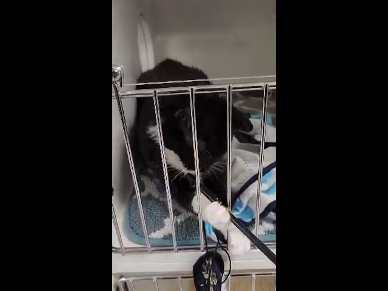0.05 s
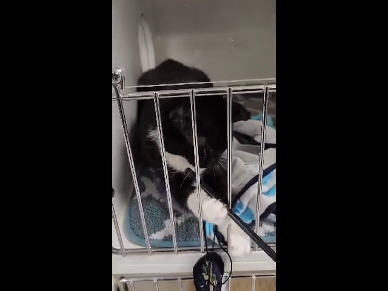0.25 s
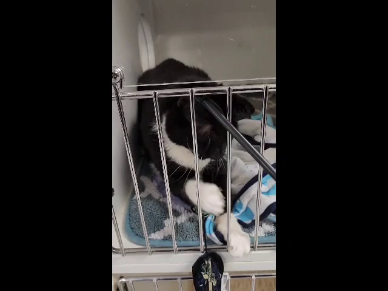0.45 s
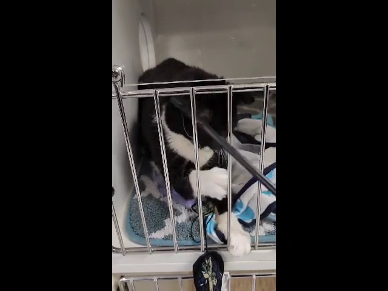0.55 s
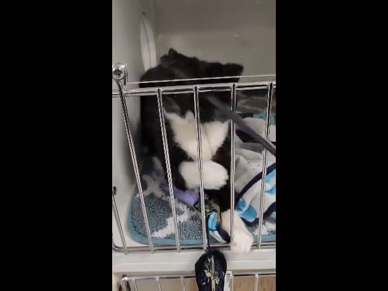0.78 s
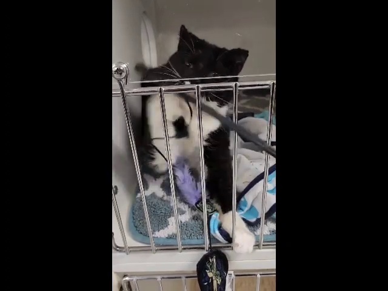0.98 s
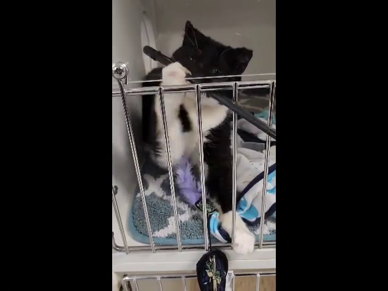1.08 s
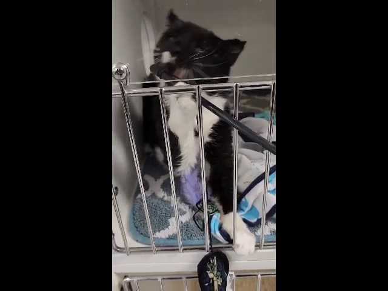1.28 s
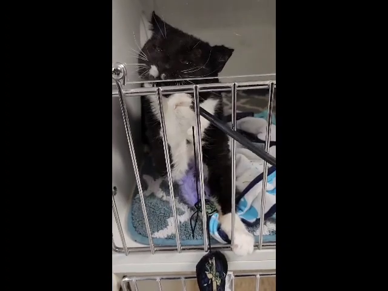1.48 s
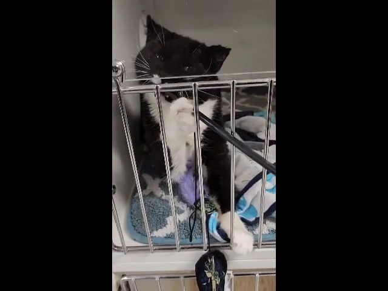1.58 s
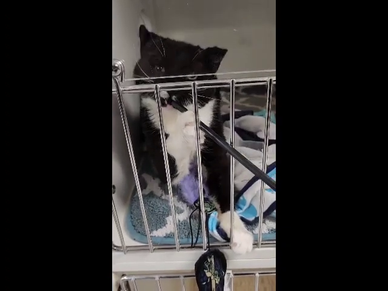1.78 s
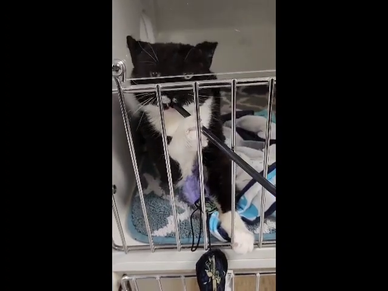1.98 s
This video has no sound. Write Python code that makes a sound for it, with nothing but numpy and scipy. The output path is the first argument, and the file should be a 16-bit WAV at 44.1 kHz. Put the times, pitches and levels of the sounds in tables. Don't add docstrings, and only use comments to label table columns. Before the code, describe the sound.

A plastic toy stick knocks against a wire cage door. Low ventilation hum alone opens, then a sharp rattling cluster strikes at 0.4-0.5 s, single clacks at 0.65, 0.74 and 0.9, a strong one at 0.99 and a bright double or triple hit at 1.1. Bars ring briefly and the steel wall booms. From 1.3 to 1.9 s, faint tooth and claw taps and soft fur brushing, close up.

```python
import sys
import numpy as np
from scipy import signal
from scipy.fft import rfft, irfft
from scipy.io import wavfile
from scipy.ndimage import uniform_filter1d

SR = 44100
rng = np.random.default_rng(int(sys.argv[2]) if len(sys.argv) > 2 else 0)


def wav_out(sig):
    wavfile.write(sys.argv[1], SR, np.round(np.clip(np.atleast_2d(sig).T, -1, 1) * 32767).astype(np.int16))


def linear_from_db(decibels):
    return 10 ** (np.asarray(decibels, float) / 20)


N = 90404
LAG_S, UNALIKE, ALIKE_HZ = -0.00023, 1.445, 314
LOW_HZ, BRIGHT_HZ = 2400, 8500
CONTACT_S, RATTLE_S, RATTLE_DB = 0.0007, 0.012, -8
WAVER_DB = 3.0
LEFT_RIGHT = np.array([[1], [-1]]) / 2


def unit(x):
    return x / np.sqrt(np.mean(x ** 2))


def colour(x, table, extra=0):
    hz, table = np.fft.rfftfreq(x.shape[-1], 1 / SR) + 1, np.array(table)
    db = np.interp(np.log(hz), np.log(table[:, 0]), table[:, 1])
    db = db - 12 * np.log2(np.maximum(table[0, 0] / hz, 1))
    return irfft(rfft(x) * linear_from_db(db + extra), x.shape[-1])


def ports(size):
    shared, *own = rfft(rng.standard_normal((3, size)))
    hz = np.fft.rfftfreq(size, 1 / SR)
    share = UNALIKE * hz ** 2 / (hz ** 2 + ALIKE_HZ ** 2)
    lag = np.exp(-2j * np.pi * hz * LAG_S * np.array([[1], [0]]))
    return irfft((shared * lag + share * np.array(own)) / np.sqrt(1 + share ** 2), size)


def ring(times, gains, hz, t60, spread):
    strikes = np.zeros(N, complex)
    np.add.at(strikes, np.minimum((times * SR).astype(int), N - 1), gains)
    pole = np.exp(2j * np.pi * hz / SR - np.log(1000) / (t60 * SR))
    mode = signal.lfilter([1], [1, -pole], strikes)
    left_phase = spread - 2 * np.pi * hz * LAG_S
    return (mode * np.exp(1j * np.array([[left_phase], [0]]))).imag


def tone_db(hz, low_db, bright_db):
    return low_db / (1 + (hz / LOW_HZ) ** 4) + bright_db / (1 + (BRIGHT_HZ / hz) ** 4)


def walk(rate):
    k = int(SR / rate)
    steps = np.repeat(rng.standard_normal(N // k + 1), k)
    return 1.6 * uniform_filter1d(uniform_filter1d(steps, k), k)[:N]


# hz, level_db [dB per Hz]
AIR = [(12, -51), (20, 5), (60, -0.5), (134, -23), (210, -4.5), (277, -14), (310, -19), (738, -33.5),
       (16000, -64.5)]
# pitch_hz, width_hz, level_db
DUCT = [(52, 14, -48), (73.4, 22, -45), (171.5, 51, -47), (213.1, 25, -53.5), (318.5, 40, -57.5),
        (412, 35, -66.5)]
# time_s, level_db
RUMBLE = [(0.0, -52), (0.13, -46.5), (0.29, -42), (0.38, -41.5), (0.85, -47.5), (1.14, -45.5),
          (1.37, -45.5), (1.66, -44), (2.05, -46)]


def ventilation():
    hz = np.fft.rfftfreq(N, 1 / SR) + 1
    out = linear_from_db(-48 + 3 * walk(17)) * unit(colour(ports(N), AIR))
    swell = np.interp(np.arange(N) / SR, *np.array(RUMBLE).T) + 45
    for f, width, db in DUCT:
        hum = unit(irfft(rfft(ports(N)) / (1 + ((hz - f) / (width / 2)) ** 2), N))
        out = out + linear_from_db(db + walk(3.4) + swell * (f < 100)) * hum
    return out


# start_s, rise_s, fall_t60_s, level_db, bright_db
BRUSHES = [(0.0, 0.0024, 0.33, -64, -1), (0.219, 0.1, 1, -64.5, -1.5), (1.305, 0.0062, 0.45, -52, -4.5),
           (1.317, .005, .22, -50, 6), (1.486, 0.0024, 0.17, -50.5, 3), (1.558, 0.015, 1, -64, -7),
           (1.831, 0.073, 0.24, -66.5, -11)]
# hz, level_db [dB per Hz]
FUR = [(700, 1), (1500, -8), (2250, -0.5), (3300, -9.5), (4700, -12.5), (7400, -2.5), (9300, -14.5),
       (15000, -22.5)]


def fur():
    t, out, hz = np.arange(N) / SR, 0, np.fft.rfftfreq(N, 1 / SR) + 1
    for s, rise, t60, db, bright in BRUSHES:
        fall = linear_from_db(-60 * np.maximum(t - s - rise, 0) / t60)
        env = linear_from_db(db) * np.clip((t - s) / rise, 0, 1) * fall
        out = out + env * unit(colour(ports(N), FUR, tone_db(hz, 0, bright)))
    return out * linear_from_db(1.3 * walk(150))


# start_s, level_db, pitch_hz, ring_t60_s
TAPS = [(0.1266, -66.5, 4840, 0.03), (1.4213, -54, 1870, 0.17), (1.42, -60, 3240, 0.1),
        (1.427, -52, 1136, 0.2), (1.489, -54, 7200, 0.019), (1.49, -54, 4220, 0.058),
        (1.499, -56.5, 2070, 0.13), (1.6346, -61, 3700, 0.09), (1.637, -60, 590, .15),
        (1.575, -64, 2900, .15), (1.665, -65, 2050, .1), (1.84, -70, 2120, .9), (1.49, -59, 11300, .02),
        (1.637, -58, 1160, 0.11), (1.731, -50, 1860, 0.045), (1.731, -55.5, 6730, 0.031),
        (0.585, -37, 396, 0.24), (1.879, -56.5, 589, 0.12), (1.8772, -64.5, 3700, 0.07),
        (1.879, -64, 1044, 0.13), (2.046, -74.5, 3000, 0.03)]
# hz, level_db [dB per Hz]
KNOCK = [(450, -10.5), (1100, -4), (1900, -8), (2650, -8), (3800, -4.5), (7400, -3), (8800, -10.5),
         (14000, -21.5)]


def taps(size=8192):
    out, t, f = np.zeros((2, N + size)), np.arange(size) / SR, np.fft.rfftfreq(size, 1 / SR)
    for s, db, hz, t60 in TAPS:
        burst = unit(irfft(rfft(ports(size)) / (1 + ((f - hz) / (0.1 * hz)) ** 2), size))
        burst = burst * linear_from_db(-60 * t / t60)
        click = unit(colour(ports(size), KNOCK)) * linear_from_db(-60 * t / 0.03 - 11)
        i = int(s * SR)
        out[:, i:i + size] += linear_from_db(db) * np.clip(t / 0.0008, 0, 1) * (burst + click)
    return out[:, :N]


# start_s, level_db, door_shake_db, low_db, bright_db
KNOCKS = [(0.4135, -35, -13.5, 3, 2), (0.4469, -14.5, -7.5, -12.5, 5.5), (0.4555, -18, -19.5, -0.5, -5),
          (0.478, -31, -15, -1, 0.5), (0.4973, -18.5, -15.5, -1, -0.5), (0.5045, -23, -8.5, -6.5, -10),
          (0.6474, -26, -16.5, -7, -6), (0.7392, -20, -4, -3, -1.5), (0.8974, -30.5, -5.5, 0, 1.5),
          (0.9627, -41, -7, -3, 8), (0.9872, -17, 3.5, -2.5, 7), (1.1064, -17.5, -0.5, -2.5, 4.5),
          (1.114, -17.5, -0.5, -1.5, -3.5), (1.1262, -22, 1, 5.5, 12.5)]
# pitch_hz, level_db, t60_s
DOOR = [(146.2, -1.5, 0.34), (174, -11, .2)]
# pitch_hz, level_db, t60_s
PANEL = [(302, -26, .4), (327.3, -24.5, 0.36), (387.2, -21, 0.45), (412, -28, 0.71), (447, -29.5, 0.5)]


def door():
    t, db, shake = np.array(KNOCKS).T[:3]
    out = sum(ring(t, linear_from_db(db + shake - 10 + d), hz, t60, 0.13) for hz, d, t60 in DOOR)
    for hz, d, t60 in PANEL:
        r = rng.standard_normal((len(t), 2))
        wall = ring(t, linear_from_db(db + d + 2.5 * r[:, 0]), hz, t60, 0.28 * r[0, 1])
        out = out + wall * linear_from_db(-3 * LEFT_RIGHT)
    push = np.hanning(int(0.0021 * SR) + 3)
    return signal.lfilter(push / push.sum(), [1], out)


# start_s, pitch_hz, level_db, t60_s
CLUMPS = [(.4478, 7300, -25, .05), (.453, 3400, -28, .1), (.503, 1850, -36, .16), (.6485, 4300, -36.5, .07),
          (.74, 4500, -30, .08), (.8985, 4000, -37, .04), (.905, 1700, -46, .2), (.99, 1750, -34, .12),
          (1.108, 3900, -28, .08), (1.126, 3600, -30, .07), (1.125, 680, -38, .3), (1.112, 6700, -31, .1),
          (1.13, 2150, -39, .3)]


def clumps(size=8192):
    out, t, f = np.zeros((2, N + size)), np.arange(size) / SR, np.fft.rfftfreq(size, 1 / SR)
    for s, hz, db, t60 in CLUMPS:
        burst = unit(irfft(rfft(ports(size)) / (1 + ((f - hz) / (0.09 * hz)) ** 4), size))
        i = int(s * SR)
        out[:, i:i + size] += burst * np.clip(t / 0.0015, 0, 1) * linear_from_db(db - 60 * t / t60)
    return out[:, :N]


def contacts(count=4):
    t = np.array(KNOCKS)[:, 0]
    r = rng.random((len(t), count))
    order = np.arange(count)
    late = np.where(order < 2, CONTACT_S, RATTLE_S) * (0.3 + r) * order
    db = np.where(order < 2, 0, RATTLE_DB) - 5 * (order == 0)
    return (t[:, None] + late).ravel(), np.repeat(np.arange(len(t)), count), np.tile(db, len(t))


# pitch_hz, level_db, t60_s
BARS = [(707, -16, 0.28), (1125, -15.5, .3), (1870, -8, 0.11), (2290, -20, .35), (3580, -10, .3),
        (3774, -8, 0.26), (3930, -8, 0.11), (4440, -12.5, 0.14), (5580, -16.5, 0.19), (6003, -13, 0.24),
        (7100, -7.5, 0.17), (7520, -8.5, 0.26)]


def bars():
    t, k, hit_db = contacts()
    db, _, low, bright = np.array(KNOCKS)[k].T[1:]
    out = 0
    for hz, mode_db, t60 in BARS:
        for off in np.linspace(-1, 1, 3) + 0.297 * rng.standard_normal(3):
            r = rng.standard_normal((len(t), 3))
            level = db + hit_db - 25 + mode_db + tone_db(hz, low, bright) + 2 * r[:, 0]
            gain = linear_from_db(level) * np.exp(2j * r[:, 2])
            bar = ring(t, gain, hz * (1 + 0.008 * off), t60, UNALIKE * r[0, 1])
            out = out + bar * linear_from_db(WAVER_DB * walk(60))
    return out


def mesh(count=90):
    t, k, hit_db = contacts()
    db, _, low, bright = np.array(KNOCKS)[k].T[1:]
    out, shape = 0, np.array(KNOCK)
    for hz in 500 + 15000 * ((np.arange(count) + rng.random(count)) / count) ** 1.3:
        r = rng.standard_normal((len(t), 3))
        mode_db = np.interp(np.log(hz), np.log(shape[:, 0]), shape[:, 1]) - 15
        level = db + hit_db - 7 + mode_db + tone_db(hz, low, bright) + 3 * r[:, 0]
        t60 = 0.12 * (4000 / hz) ** 0.15 * np.exp(0.18 * r[0, 2])
        out = out + ring(t, linear_from_db(level) * np.exp(2j * r[:, 1]), hz, t60, UNALIKE * r[0, 1])
    return out


# start_s, pitch_hz, level_db, t60_s
STRUCK = [(0.4483, 1122, -37.5, 0.45), (0.4475, 3745, -40, 0.8), (0.449, 7400, -38, 0.11),
          (0.45, 3560, -38, .25), (0.497, 1871, -33, 0.2), (0.498, 302, -41, 0.35),
          (0.498, 5080, -38.5, .12), (0.497, 6002, -44, .45), (.498, 2256, -52, .8), (.498, 3607, -44, .35),
          (.498, 5615, -42, .24), (.498, 4360, -46, .3), (.498, 7600, -46, .5), (0.649, 1122, -47, 0.4),
          (0.648, 3752, -48, 0.6), (.649, 2256, -48, .3), (.649, 5696, -50, .3), (0.741, 4690, -35, .1),
          (.741, 4355, -47, .3), (.741, 3558, -42, .25), (.741, 3768, -43, .3), (.741, 926, -47, .23),
          (.741, 600, -52, .25), (.741, 1868, -46, .5), (.741, 2261, -47, .3), (0.74, 412, -46, 0.51),
          (0.898, 1540, -47, .12), (.899, 1850, -46, .25), (.899, 3550, -50, .4), (0.988, 1872, -34, 0.2),
          (0.989, 1552, -34, 0.12), (0.988, 6003, -45, 0.55), (.989, 5060, -39, .15), (.989, 3700, -48, .6),
          (1.107, 3755, -43, 0.75), (1.114, 706, -43, 0.26), (1.127, 1830, -37, .15),
          (1.129, 5500, -40, 0.33), (1.128, 1125, -40, 0.6), (1.127, 3615, -39, .45),
          (1.127, 2256, -45, .6), (1.127, 6006, -44, .35), (1.127, 620, -50, .45)]


def struck():
    out = 0
    for s, hz, db, t60 in STRUCK:
        r, start = rng.standard_normal(3), np.array([s])
        spread = 2 * np.pi * hz * LAG_S + 1.1 * np.sign(r[0])
        line = ring(start, linear_from_db(db - 2.5), hz, t60, spread)
        twin_hz = hz * (1 + 0.014 * np.sign(r[1]))
        twin = ring(start, linear_from_db(db - 2), twin_hz, 0.7 * t60, 1.2 * r[2])
        out = out + (line + twin) * linear_from_db(WAVER_DB * walk(70))
    return out


def cracks(size=22050):
    out, t = np.zeros((2, N + size)), np.arange(size) / SR
    hz = np.fft.rfftfreq(size, 1 / SR) + 1
    top = 1 / (1 + (6900 / hz) ** 8)
    rise = np.clip(t / CONTACT_S, 0, 1) ** 2
    crack = linear_from_db(9.5 - 60 * t / 0.0058)
    low_env = rise * (crack + linear_from_db(-8 - 60 * t / 0.37))
    top_env = rise * (crack + linear_from_db(-8 - 60 * t / 0.23))
    steel = 3.5 * walk(1500)[:len(hz)]
    for s, db, _, low, bright in KNOCKS:
        tone = rfft(unit(colour(ports(size), KNOCK))) * linear_from_db(db - 8 + tone_db(hz, low, bright) + steel)
        i = int(s * SR)
        out[:, i:i + size] += low_env * irfft(tone * (1 - top), size) + top_env * irfft(tone * top, size)
    return out[:, :N] * linear_from_db(0.85 * walk(900))


# pitch_hz, level_db, t60_s
STICK = [(1677, -14, 0.036), (4018, -5.5, 0.019), (7200, -9.5, 0.017), (11620, -15, 0.011),
         (13720, -12.5, 0.0079)]


def stick():
    t, db, _, low, bright = np.array(KNOCKS).T
    out = 0
    for hz, d, t60 in STICK:
        r = rng.standard_normal((len(t), 2))
        gain = linear_from_db(db + d + tone_db(hz, low, bright) + 1.6 * r[:, 0])
        out = out + ring(t + CONTACT_S, gain, hz, t60, UNALIKE * r[0, 1])
    return out


def scene():
    cat = fur() + taps()
    cage = door() + clumps() + bars() + mesh() + struck() + cracks()
    return ventilation() + cat + cage + stick()


def band_limit(x):
    return signal.sosfilt(signal.butter(12, 16480, fs=SR, output="sos"), x)


# pitch_hz, width_hz, level_db
NOTCHES = [(2860, 260, -8), (8600, 350, -14)]
# hz, left_minus_right_db
PORT_BALANCE = [(60, 0), (125, 1), (250, -1.5), (550, 6), (1100, 1.5), (2000, 1), (4000, -2.5), (8000, 1.5),
                (12000, -2.5)]


def record(dry):
    hz = np.fft.rfftfreq(N, 1 / SR)
    body_db = sum(db / (1 + ((hz - f) / (width / 2)) ** 2) for f, width, db in NOTCHES)
    port_hz, port_db = np.array(PORT_BALANCE).T
    lean_db = np.interp(np.log(hz + 1), np.log(port_hz), port_db)
    heard = irfft(rfft(dry) * linear_from_db(body_db + lean_db * LEFT_RIGHT), N)
    heard = signal.sosfilt(signal.butter(2, 33, "high", fs=SR, output="sos"), heard)
    mix = signal.sosfilt(signal.ellip(8, 0.2, 60, 15300, fs=SR, output="sos"), heard)
    return band_limit(mix)


dry = scene()
out = record(dry)
wav_out(out)
```